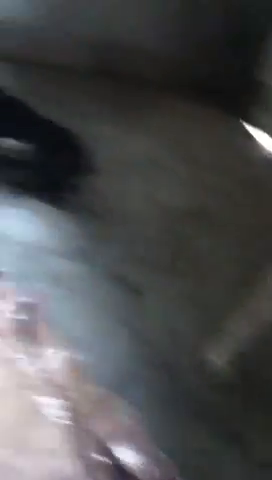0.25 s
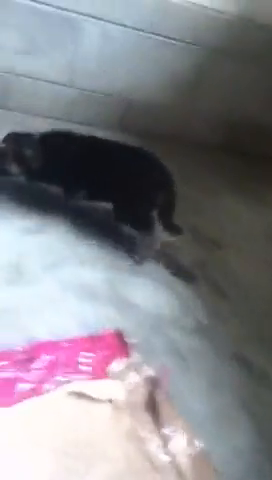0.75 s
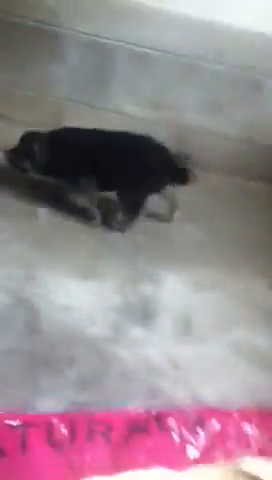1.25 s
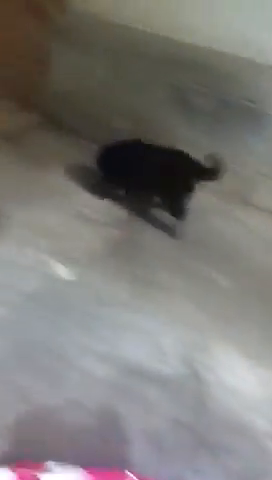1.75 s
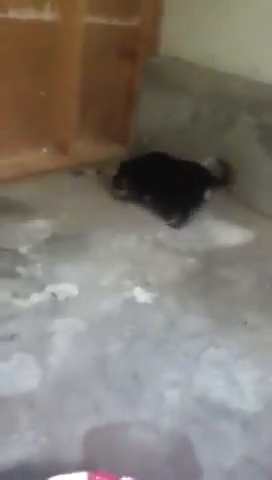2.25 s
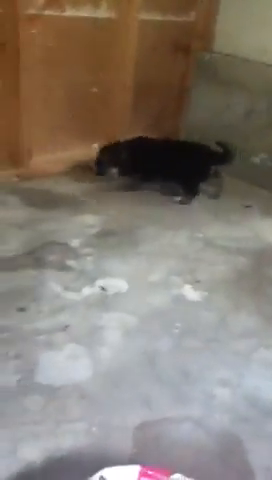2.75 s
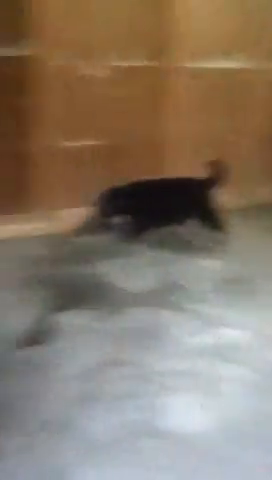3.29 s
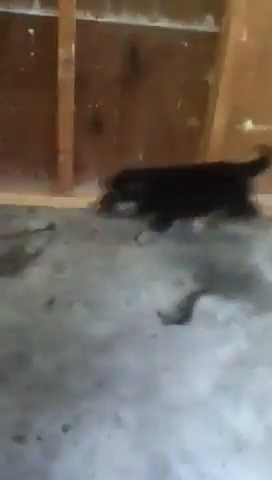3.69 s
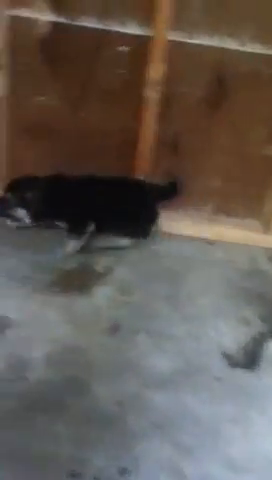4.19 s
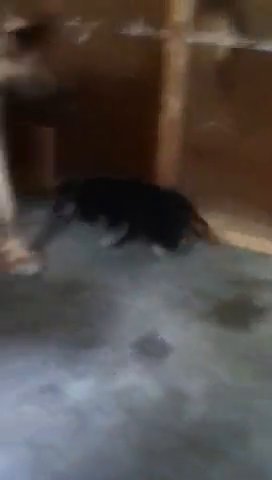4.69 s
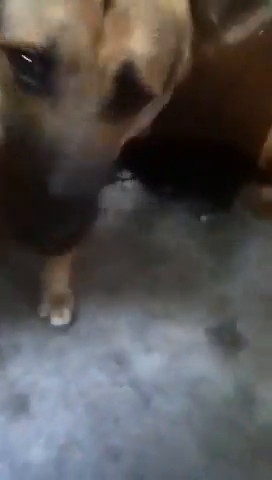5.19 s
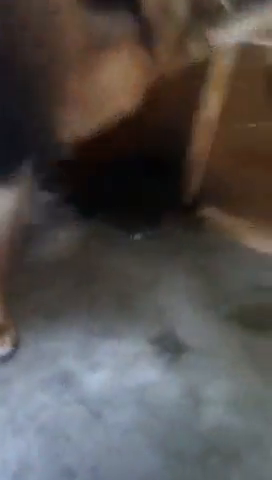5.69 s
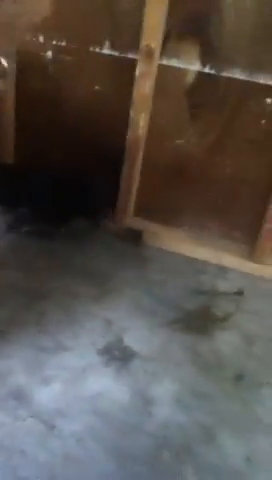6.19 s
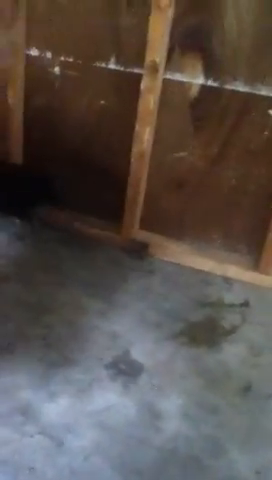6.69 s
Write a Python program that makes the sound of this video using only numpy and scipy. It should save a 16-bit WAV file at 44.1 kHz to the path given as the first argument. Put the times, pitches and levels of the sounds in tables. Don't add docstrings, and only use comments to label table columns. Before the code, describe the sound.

In a bare, echoing concrete shed, the tail of a puppy's cry fades, then a loud, shrill scream lasts most of a second. Separate rising yelps follow, then a swelling cry, a quiet whine, a cracked yelp and small whimpers. A big dog's faint huffs, scuffs and low paw thumps pass underneath. A phone mic a few metres away adds faint hum and hiss, and fingers knock its case at the end.

```python
import sys
import numpy as np
from scipy import signal
from scipy.fft import rfft, irfft, next_fast_len
from scipy.io import wavfile
from scipy.ndimage import uniform_filter1d, minimum_filter1d, map_coordinates

SR = 44100
rng = np.random.default_rng(int(sys.argv[2]) if len(sys.argv) > 2 else 0)


def ratio(d):
    e = np.asarray(d, float) / 20
    return 10 ** e


def transcribe(u):
    v = np.clip(np.atleast_2d(u).T, -1, 1)
    q = np.round(v * 32767).astype(np.int16)
    wavfile.write(sys.argv[1], SR, q)


N = 306054
LEAD = 13230

# start_s, pitch_hz, level_db, mouth_opening_db (gain of the overtones)
EARLIER_CRY = [(-.25, 950, -58, 1), (-.12, 1099, -12, 1.5), (-.05, 1162, -23.5, 2.5), (-.03, 1038, -17, -7),
               (.01, 1034, -23, 5)]
SCREAM = [(.198, 724, -31.5, 3.5), (.217, 793.6, -12, 7), (0.231, 928.7, -9.5, 2), (0.333, 996.4, -22, 5.5),
          (.6, 973.3, -21.5, 6.5), (.76, 990.7, -12, -13.5), (.82, 1002, -14.5, -8),
          (.87, 969.8, -18, -0.5), (1.0, 959.8, -21.5, 1)]
CRACKED_CRY = [(4.16, 859, -47.5, 0.5), (4.179, 893, -22, -4.5), (4.195, 937, -19, -0.5),
               (4.229, 1055, -14, 2.5), (4.274, 1176, -22, 0)]
AFTER_CRY = [(4.3, 1098, -36.5, 2), (4.421, 1034, -40.5, 12), (4.46, 1013, -31, 0.5),
             (4.551, 1048, -35.5, -8), (4.62, 1077, -70, 4)]
SWELLING_CRY = [(2.82, 1015, -42, -9.5), (2.959, 950, -37, -18.5), (3.034, 962.6, -27.5, -20.5),
                (3.061, 980.6, -22, 14), (3.13, 1005, -13, 5), (3.17, 1032, -15.5, -4),
                (3.205, 1057, -22.5, -1.5), (3.26, 1068, -30, -9), (3.331, 1049, -33, -10.5)]
HOARSE_CRY = [(4.787, 747, -39.5, -42), (4.808, 801, -30, -42), (4.83, 887, -24.5, 6),
              (4.872, 985.4, -16.5, -1.5), (4.919, 1030, -42, 11), (4.97, 1044, -55, 5)]
# start_s, length_s, first_hz, reached_hz, glide_s
YELPS = [
    (1.258, .076, 636, 744.6, .2),
    (1.326, 0.26, 918.5, 996.4, 0.13),
    (1.984, .22, 806, 1054, 0.13),
    (2.592, 0.25, 722.5, 1024, .15),
]
# start_s, length_s, first_hz, reached_hz, glide_s
WHIMPERS = [
    (3.516, .16, 714, 931.6, 0.12),
    (5.097, 0.1, 779, 882.3, 0.0598),
    (5.34, 0.055, 704, 776, .045),
    (5.788, 0.057, 994, 939, 0.071),
    (5.851, 0.054, 950, 983, 0.023),
    (6.115, 0.061, 888, 889, 0.039),
    (6.161, 0.091, 873, 942, .04),
    (6.4, 0.11, 700, 657, 0.07),
    (6.913, 0.04, 1042, 957, .05),
]
# peak_db, time_to_peak_s, fall_by_end_db
EFFORT = [(-12, .03, 1.5), (-19, .015, 37.5), (-14.5, 0.029, 15), (-12.5, .02, 20.5), (-30.5, 0.035, 11.5),
          (-23, .035, 32), (-27, 0.029, 25), (-39, .006, 2), (-30, 0.011, 27.5), (-36, 0.011, -0.5),
          (-31.5, 0.018, 25), (-38.5, 0.026, 11.5), (-30.5, 0.034, 1)]
# half_pitch_lines_db, their_loss_by_end_db
VOICES = [(-11, -9.5, -30.5), (-8, -7.5, -34), (-8.5, -2, -31.5, 12, 89.5), (3.7, -17, -30.5),
          (-8, -4, -30.5), (-1.5, -7.5, -22.5, -5.5, 107), (-5, -6, -35.5, 0.5, 146),
          (-8, -2.5, -23, -18.5, 16), (-6.5, -9, -30), (-3, -2, -30), (-8, -10.5, -23.5, -15, 35),
          (-21.5, -41, -19, -35, 17), (-9, -24, -13.5, -30, 18), (-7, -12, -23.5, -15, 1),
          (-1.5, -12, -23.5, -9, 3), (7.5, 7, -28.5, -0.5, -7), (9, 1, -26, -8, 7.5),
          (12.5, -9, -11.5, -14, 8.5), (-3, -7, -15, -25, -1)]
# frequency_hz, gain_db
OPEN_THROAT = [(300, -29.5), (600, -10.5), (1000, 3), (1400, 6), (2000, 2), (3000, -2), (4000, -2.5),
               (5000, -3.5), (6000, -12.5), (7000, -30.5), (9000, -46.5), (14000, -68)]
# frequency_hz, gain_db
MOUTHS = [
    [(2100, 5), (3300, 2), (4400, 4.5)],
    [(2000, 3.5), (3000, 1.5), (5000, -3.5), (6000, 2.5)],
    [(2200, 6), (3000, 12), (4300, 6), (5800, -11)],
    [(2100, -4.5), (3100, -2.5), (4100, 6)],
    [(2050, 5), (3100, 2), (5000, 1), (6200, -7.5)],
    [(1950, 7), (2900, 4.5), (5500, -11)],
    [(1350, 7), (2000, -6.5), (2700, 7.5), (4100, 4)],
    [(1900, 3), (2900, -2.5), (3900, -2.5)],
    [(1800, -4.5), (2800, 2), (5000, -1)],
    [(1550, 19), (2050, 7.5), (3100, 5.5), (5000, -1)],
]
# frequency_hz, gain_db
NOSE = [(350, -3), (500, -14), (800, 9.5), (1400, -4.5), (1900, -15), (2600, -31.5), (4200, -19.5),
        (5500, -30), (9000, -54)]
# frequency_hz, gain_db
SNOUT = [(1380, 4)]
# frequency_hz, decay_s
SHED_DECAY = [(300, 0.38), (1000, 0.55), (2000, 0.51), (4000, 0.46), (7000, 0.41), (12000, 0.078)]
# peak_s, length_s, level_db, centre_hz, width_octaves
RUSTLES = [(1.273, 0.1, -55, 362, 0.4), (1.503, 0.088, -52, 380, 1.5), (4.436, 0.35, -59, 738, .15),
           (1.53, 0.15, -65, 7000, .47), (2.383, 0.069, -53, 2470, .82), (3.372, 0.26, -64, 7830, 0.63),
           (3.596, 0.25, -58.5, 170, 0.23), (3.657, 0.33, -56.5, 3660, 0.8),
           (4.106, 0.064, -56, 2490, 0.74), (5.09, 0.093, -46.5, 332, 0.095),
           (5.295, 0.4, -44.5, 335, 0.58), (5.248, 0.19, -56, 2480, 0.96), (6.432, .1, -49.5, 265, 0.72),
           (6.714, 0.038, -47.5, 2510, .95), (6.751, 0.016, -43, 1280, 0.81),
           (6.91, 0.1, -40.5, 1890, 0.69)]
# start_s, peak_db, pitch_hz
THUMPS = [
    (0.86, -57, 153),
    (2.817, -47, 134),
    (4.029, -42, 173),
    (4.399, -45.5, 120.7),
    (4.751, -53.5, 241),
    (6.529, -49, 147),
]
# start_s, peak_db, bright_db, push_db
TICKS = [
    (6.761, -24, -34.5, -30),
    (6.771, -38.5, -7, -18),
    (6.839, -30, -16.5, -26.5),
    (6.851, -39.5, -14.5, -9),
    (6.864, -14, -18, -34),
    (6.907, -36, -14, -30),
]
# frequency_hz, width_hz, level_db
CASE = [
    (1250, 420, 0),
    (2050, 480, -1),
]
# time_s, level_db
STIR = [
    (0.0, 5.5),
    (.29, -3.5),
    (1.14, 2),
    (1.4, -4),
    (2.96, 1),
    (5.2, 5.5),
    (6.22, 1.5),
    (6.94, 6),
]
# frequency_hz, level_db
HUM = [(15, -68), (25, -31), (54, 0.5), (204, 0), (371, -4.5), (883, -8), (1030, -7), (1600, -7),
       (2500, -30), (3250, -58), (5500, -120)]
# frequency_hz, level_db
HISS = [(1180, -29), (2000, -7.5), (2140, -1.5), (3710, -6.5), (4340, -3.5), (4810, -7.5), (8260, -8),
        (15600, -12)]

GLIDE_BEND, SAG_PER_S = 2.3, 0.66
ATTACK_BEND, FADE_BEND = 0.53, 1
OPENING_DB, OPENING_SHARE = -29.5, 0.33
PURER_PER_DB, DULLER_PER_DB = 0.38, 0.12
ONSET_BREATH_DB, ONSET_S = 12.5, 0.022
SHIMMER_DB = 1.92
RISE_SHARE = 0.38
HUM_DB, HISS_DB, HISS_FOLLOWS, HISS_DB_PER_S = -60.5, -65, 0.59, 0.11
STARVED_HZ, STARVED_SHARE, STARVED_SPREAD_DB = 7500, 0.22, 7
TOP_HZ = 15780


def unit(x):
    return x / np.sqrt(np.mean(x ** 2) + 1e-20)


def along(points, hz):
    f, v = np.transpose(points)
    return np.interp(np.log(hz + 1), np.log(f + 1), v)


def wobble(rate, size):
    knots = rng.standard_normal(int(size * rate / SR) + 4)
    return map_coordinates(knots, [np.arange(size) * rate / SR])


def filtered(x, response):
    m = next_fast_len(len(x) + 8192)
    return irfft(rfft(x, m) * response(np.fft.rfftfreq(m, 1 / SR)), m)[:len(x)]


def coloured(spectrum, size):
    return unit(filtered(rng.standard_normal(size), lambda hz: ratio(along(spectrum, hz))))


def puppy():
    out = np.zeros(LEAD + N + SR)
    courses = [EARLIER_CRY, SCREAM, CRACKED_CRY, AFTER_CRY, SWELLING_CRY, HOARSE_CRY]
    courses += [course(*tune, *push) for tune, push in zip(YELPS + WHIMPERS, EFFORT)]
    tracts = [(OPEN_THROAT, mouth) for mouth in MOUTHS] + [(NOSE, SNOUT) for _ in WHIMPERS]
    for rows, voice, (tract, mouth) in zip(courses, VOICES, tracts):
        sound = cry(rows, voice, tract, mouth)
        out[LEAD + round(rows[0][0] * SR):][:len(sound)] += sound
    return out[:LEAD + N]


def course(start, length, first_hz, reached_hz, glide, peak_db, swell, fall_db):
    u = np.arange(0, length, 1 / 500)
    still_to_go = np.clip(1 - u / glide, 0, 1) ** GLIDE_BEND
    pitch = reached_hz - (reached_hz - first_hz) * still_to_go
    pitch = pitch * (1 - SAG_PER_S * np.clip(u - glide, 0, None))
    rise_db = 20 * ATTACK_BEND * np.log10(np.clip(u / swell, 0.12, 1))
    fade = np.clip((u - swell) / abs(length - swell), 0, 1) ** FADE_BEND
    level_db = peak_db + rise_db - fall_db * fade
    opening_db = OPENING_DB * np.exp(-u / abs(OPENING_SHARE * swell))
    return np.transpose([start + u, pitch, level_db, opening_db])


def cry(rows, voice, tract, mouth):
    s, *cols = np.transpose(rows)
    t = np.arange(s[0], s[-1], 1 / SR)
    pitch, db, opening_db = [np.interp(t, s, c) for c in cols]
    first_db, top_db, breath_db, *crack = voice
    softer_db = db.max() - db
    first_db = first_db + PURER_PER_DB * softer_db
    top_db = top_db + opening_db - DULLER_PER_DB * softer_db
    breath_db = breath_db + ONSET_BREATH_DB * np.exp(-(t - s[0]) / ONSET_S)
    half_db = crack[0] - crack[1] * (t - s[0]) / (s[-1] - s[0]) if crack else 0

    jitter = 0.0026 * wobble(45, len(t)) + 0.14 * ratio(breath_db) * wobble(250, len(t))
    phase = 2 * np.pi * np.cumsum(pitch * (1 + jitter)) / SR
    step = 2 if crack else 1
    k = np.arange(1, 12 * step + 1)[:, None] / step
    line_hz = k * pitch

    level = along(tract, line_hz) + top_db * np.clip(np.log2(line_hz / 1900) / 1.88, 0, 1)
    for hz, peak_db in mouth:
        level = level + peak_db * np.exp(-(np.log2(line_hz / hz) / 0.11) ** 2)
    level = level + np.where(k == 1, first_db, 0) + np.where(k % 1, half_db, 0)
    level = level + SHIMMER_DB * np.array([wobble(30, len(t)) for _ in k])
    strength = ratio(level)
    tone = (strength * np.sin(k * phase + k * k)).sum(0) / np.sqrt((strength ** 2).sum(0) / 2)

    puffs = rng.standard_normal(len(t)) * (1 + np.cos(phase))
    breath = unit(filtered(puffs, lambda hz: ratio(along(tract, hz))))
    edges = np.clip((t - s[0]) / 0.0027, 0, 1) * np.clip((s[-1] - t) / 0.0047, 0, 1)
    return ratio(db) * edges * (tone + ratio(breath_db) * breath)


def shed(x):
    hz, t, z = signal.stft(rng.standard_normal(SR), SR, nperseg=256)
    decay = ratio(-60 * t / along(SHED_DECAY, hz)[:, None])
    tail = signal.istft(z * decay, SR, nperseg=256)[1]
    tail = tail * (1 - np.exp(-np.arange(len(tail)) / SR / 0.0011))
    return signal.fftconvolve(x, tail / np.linalg.norm(tail))[:len(x)]


def big_dog():
    out, t = np.zeros(N), np.arange(N) / SR
    for top, length, db, hz, octaves in RUSTLES:
        start, end = top - RISE_SHARE * length, top + (1 - RISE_SHARE) * length
        a, b = round(start * SR), min(N, round(end * SR))
        noise = rng.standard_normal(b - a)
        band = filtered(noise, lambda f: np.exp(-(np.log2((f + 1) / hz) / octaves) ** 2 / 2))
        grain = ratio(db + 0.55 * wobble(60, b - a))
        out[a:b] += grain * np.interp(t[a:b], [start, top, end], [0, 1, 0]) * unit(band)
    for s, db, hz in THUMPS:
        u = np.clip(t - s, 0, None)
        push = np.sin(2 * np.pi * hz * u) + 0.43 * np.sin(2 * np.pi * 4.4 * hz * u)
        out += ratio(db - 2.5 - 60 * u / 0.2) * push
    return out


def resonance(f, centre_hz, width_hz):
    return 1j * f * width_hz / (centre_hz * centre_hz - f * f + 1j * f * width_hz)


def case_response(f):
    ring = sum((-1) ** k * ratio(db) * resonance(f, c, w) for k, (c, w, db) in enumerate(CASE))
    return ring / (1 + 1j * f / 4500)


def fingers():
    body, edge, push = np.zeros((3, N))
    for s, db, bright_db, push_db in TICKS:
        i = round(s * SR)
        body[i] = ratio(db + 29.0)
        edge[i] = ratio(db + bright_db + 24)
        push[i] = ratio(db + push_db + 41.5)
    bright = filtered(edge, lambda f: 3 * resonance(f, 3800, 1270) ** 2)
    low = filtered(push, lambda f: resonance(f, 170, 250))
    return filtered(body, case_response) + bright + low


def air():
    t = np.arange(N) / SR
    stir_db = np.interp(t, *np.transpose(STIR))
    lumps_db = 1.3 * wobble(12, N)
    hum = ratio(HUM_DB + stir_db + lumps_db) * coloured(HUM, N)
    hiss = ratio(HISS_DB + HISS_FOLLOWS * stir_db + HISS_DB_PER_S * t) * coloured(HISS, N)
    return hum + hiss


def scene():
    voice = puppy()
    heard = (ratio(-2.0) * voice + ratio(-5.0) * shed(voice))[LEAD:]
    return (heard + big_dog() + fingers() + air())[None]


def starved(x):
    hz, _, z = signal.stft(x, SR, nperseg=2048)
    voice_band = np.abs(z[(hz > 600) & (hz < STARVED_HZ)])
    busy_db = 20 * np.log10(voice_band + 1e-9).mean(0)
    luck = rng.standard_normal((len(hz) // 12 + 1, z.shape[1]))
    luck = np.repeat(luck, 12, axis=0)[:len(hz)]
    crowding = (busy_db - np.quantile(busy_db, 1 - STARVED_SHARE)) / STARVED_SPREAD_DB
    odds = np.minimum(crowding, 0.9) + np.log2((hz[:, None] + 1) / STARVED_HZ) + luck
    keep = (hz[:, None] < STARVED_HZ) | (odds < 0.6) | (np.abs(z) > ratio(-78))
    return signal.istft(z * keep, SR, nperseg=2048)[1][:len(x)]


def roll_off(x):
    return signal.sosfilt(signal.butter(12, 15760, fs=SR, output="sos"), x)


def record(dry):
    mic = dry[0] * np.clip(np.arange(N) / SR / 0.00083, 0, 1)
    needed = np.minimum(1, 0.71 / (np.abs(mic) + 1e-9))
    mic = mic * uniform_filter1d(minimum_filter1d(needed, size=441), size=441)
    mic = filtered(mic, lambda hz: (hz < TOP_HZ) * hz / np.hypot(hz, 60))
    mix = starved(mic)[None]
    return roll_off(mix)


dry = scene()
out = record(dry)
transcribe(out)
```